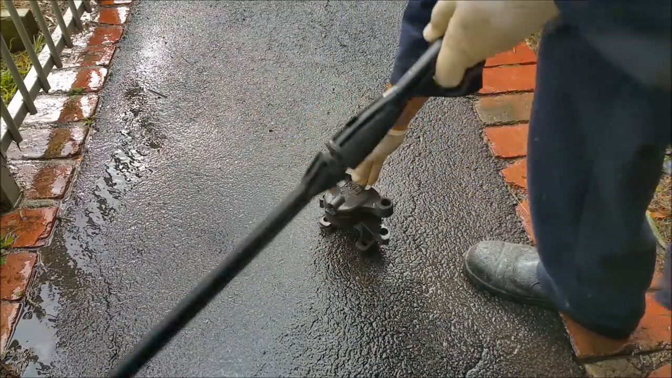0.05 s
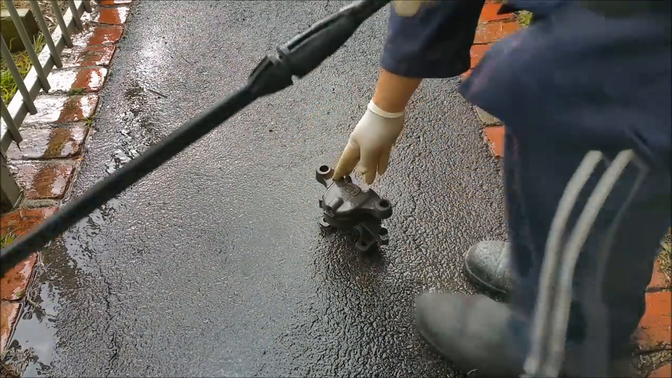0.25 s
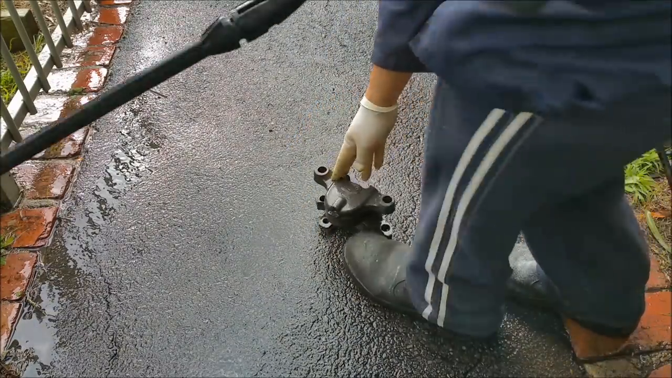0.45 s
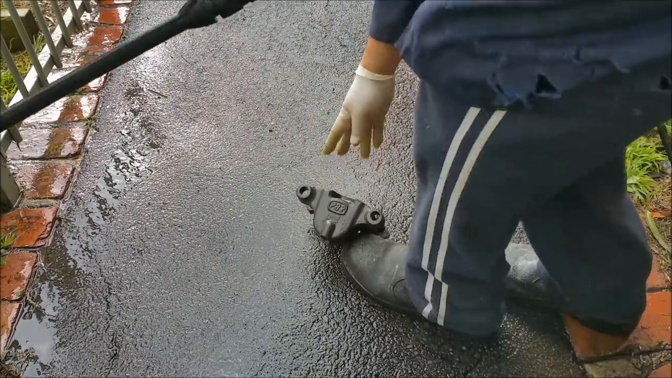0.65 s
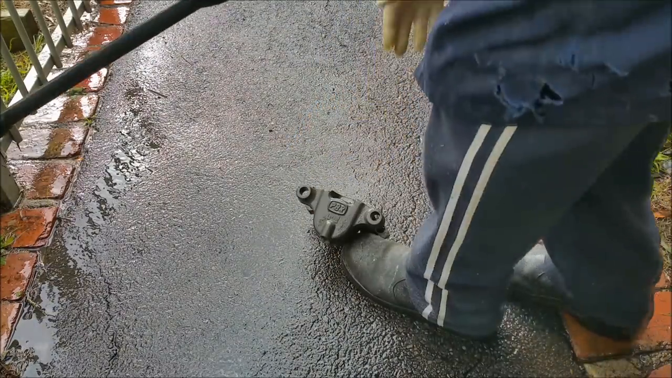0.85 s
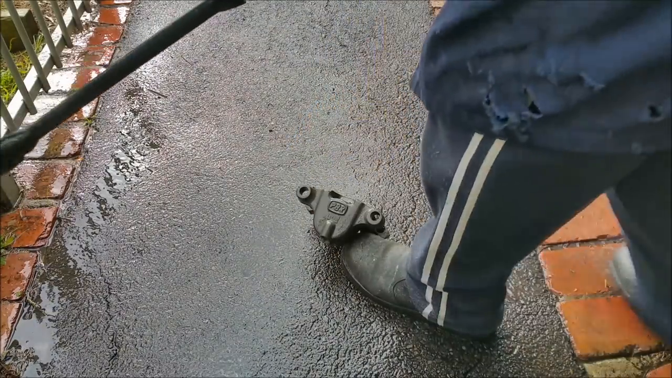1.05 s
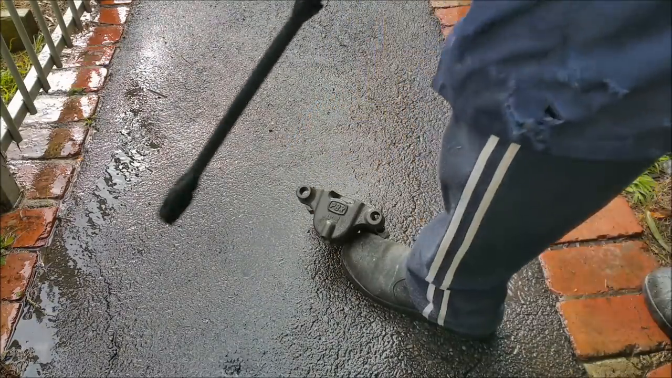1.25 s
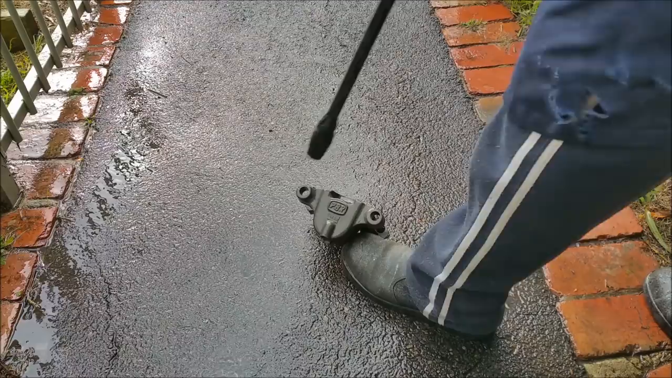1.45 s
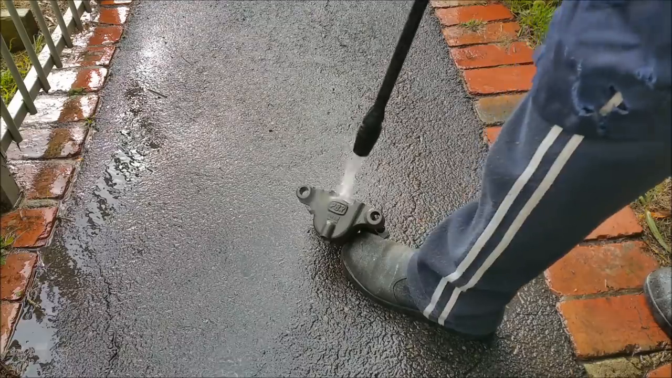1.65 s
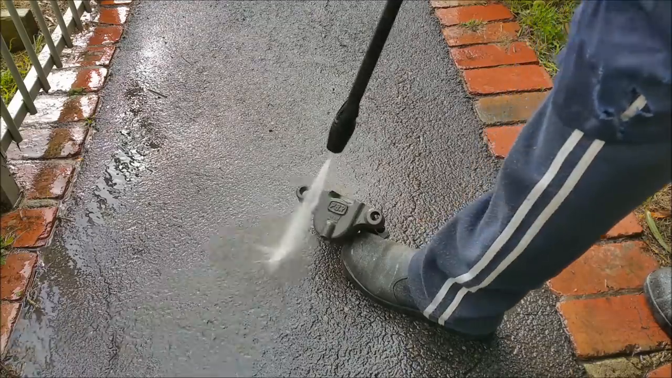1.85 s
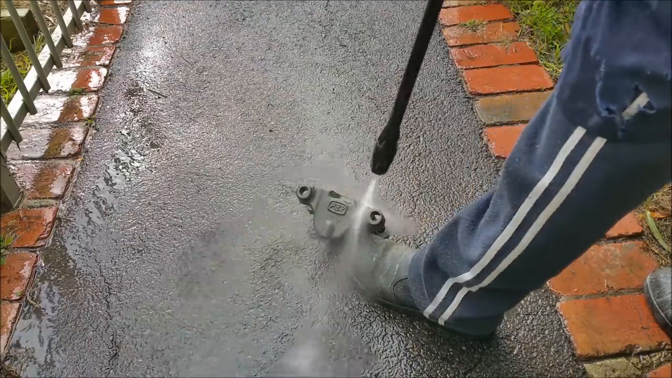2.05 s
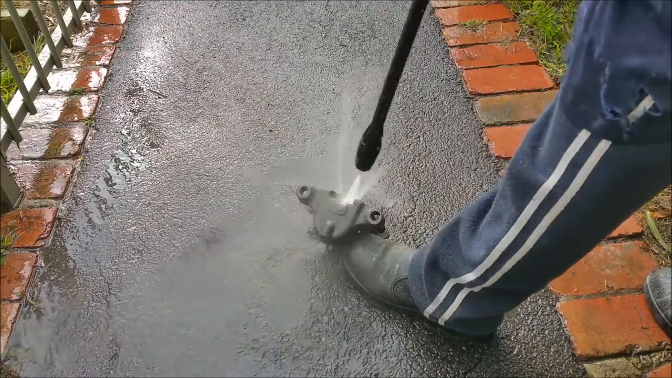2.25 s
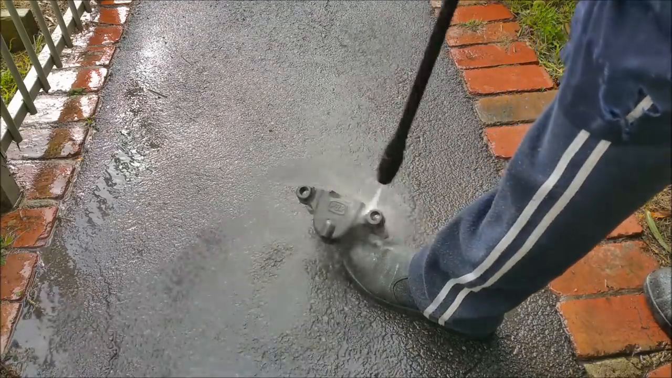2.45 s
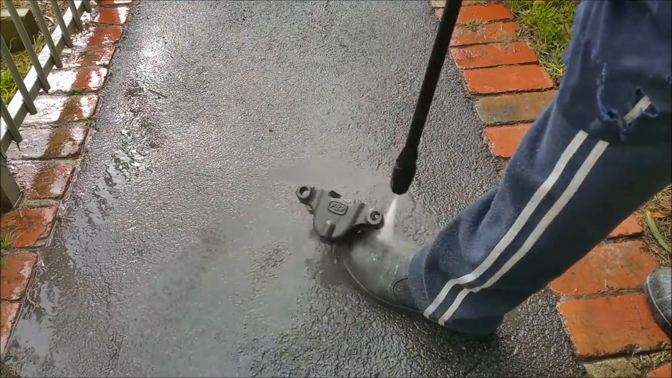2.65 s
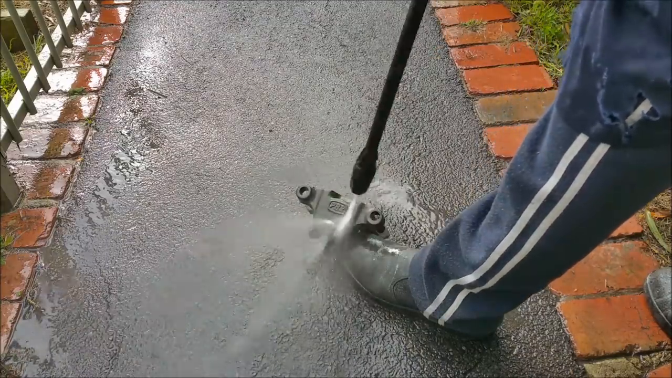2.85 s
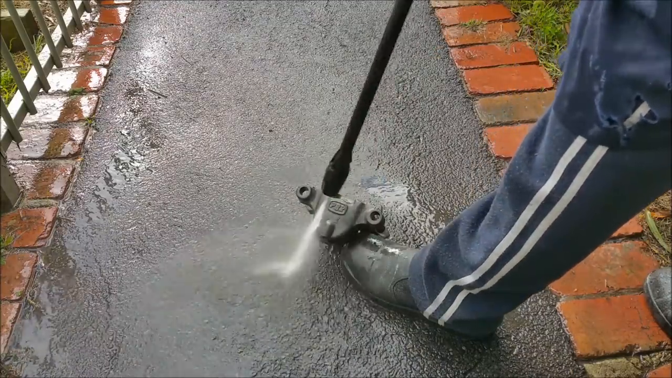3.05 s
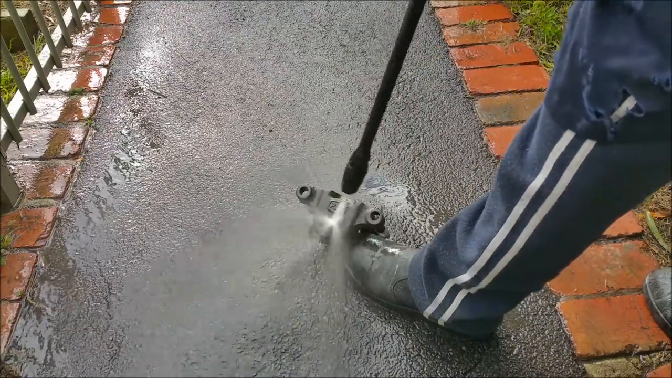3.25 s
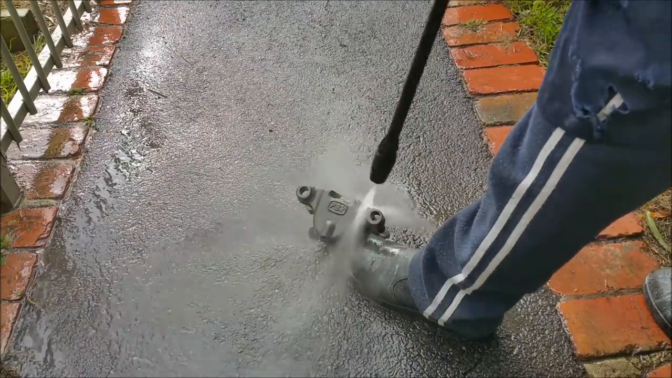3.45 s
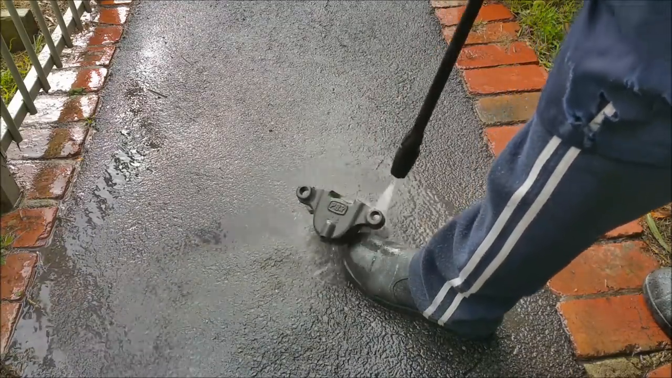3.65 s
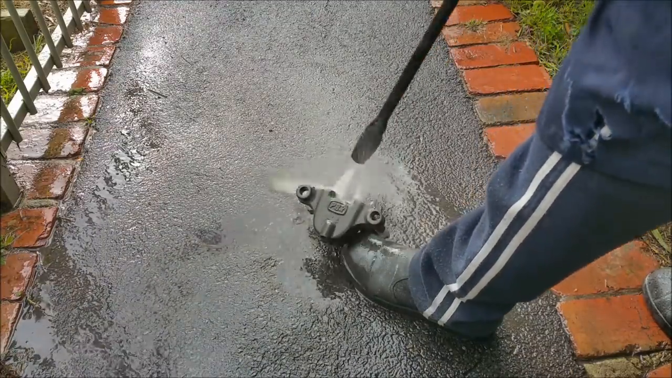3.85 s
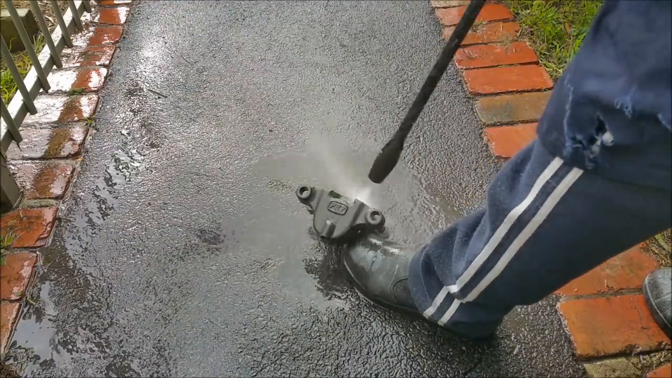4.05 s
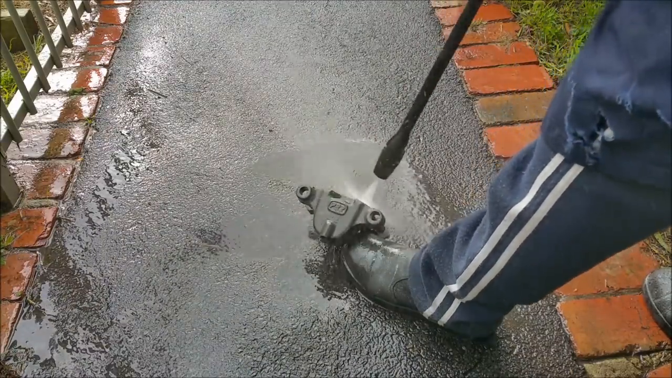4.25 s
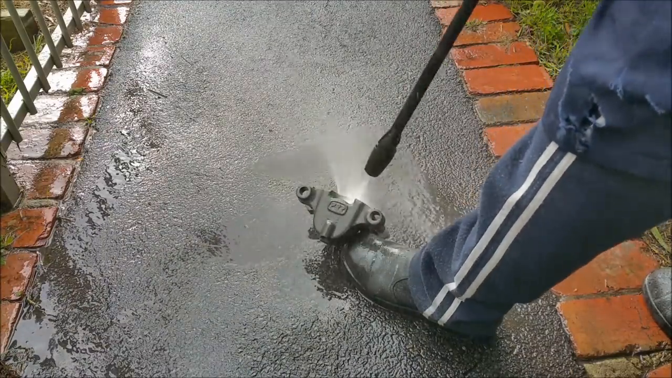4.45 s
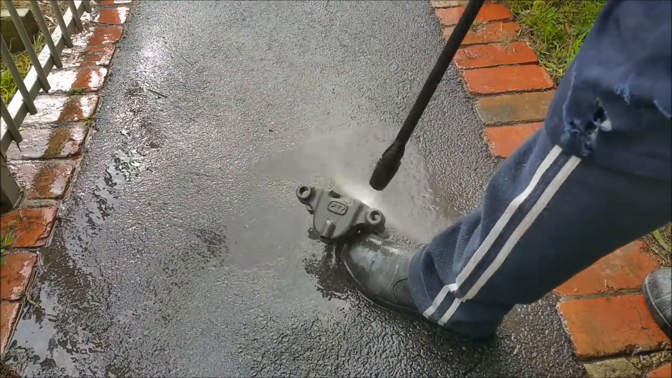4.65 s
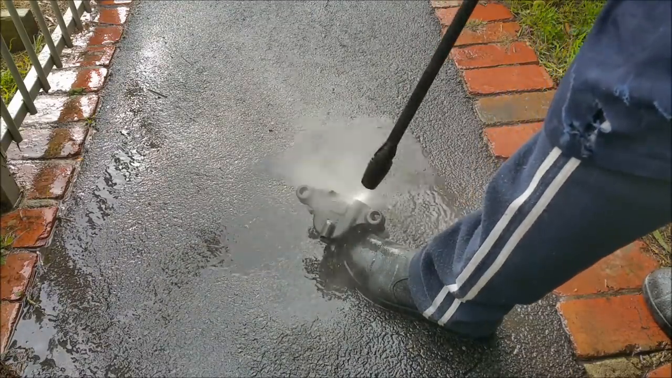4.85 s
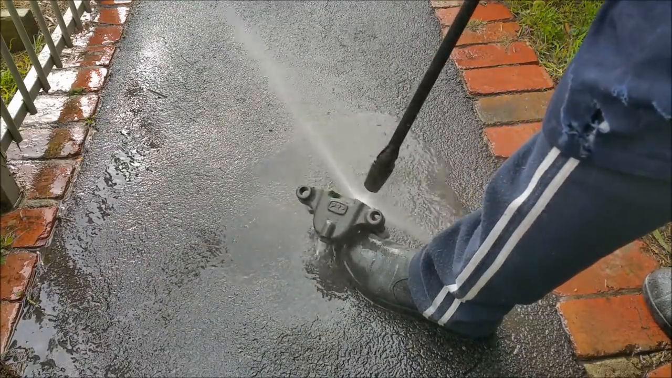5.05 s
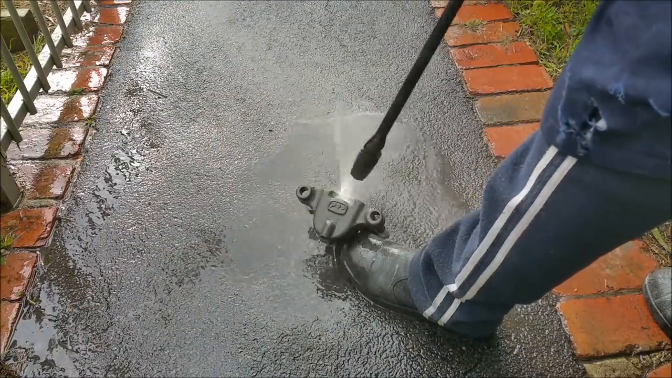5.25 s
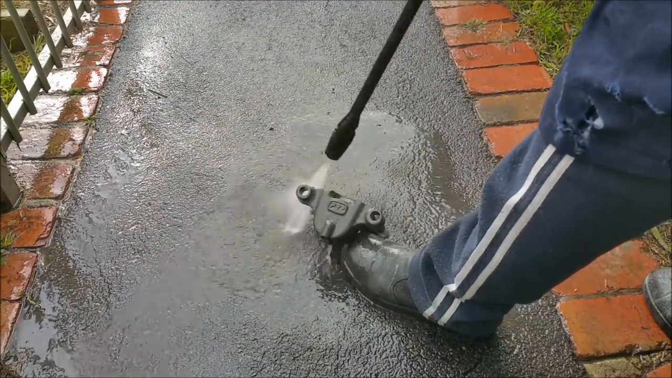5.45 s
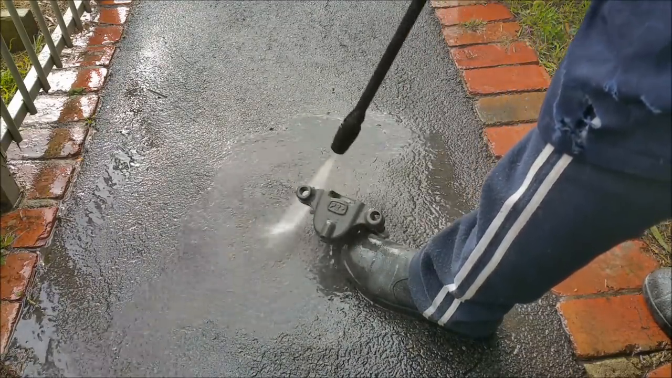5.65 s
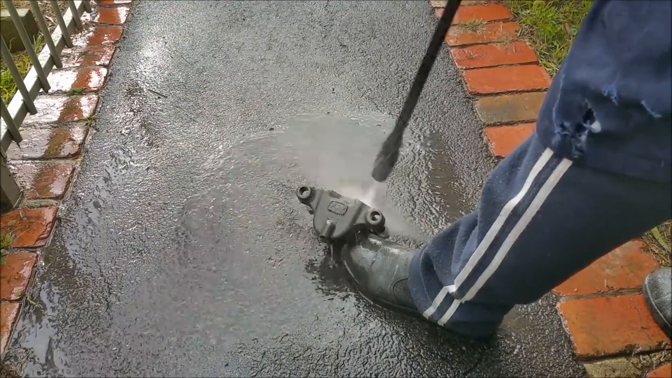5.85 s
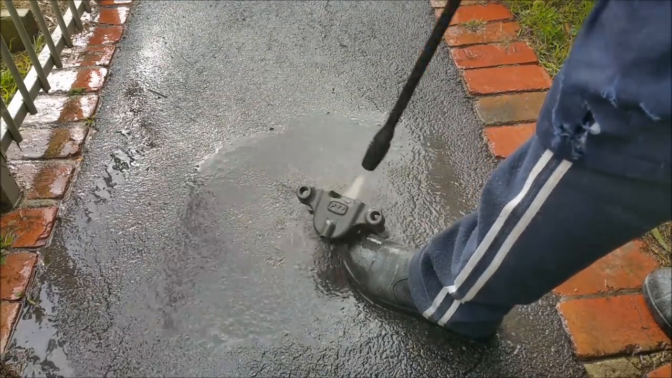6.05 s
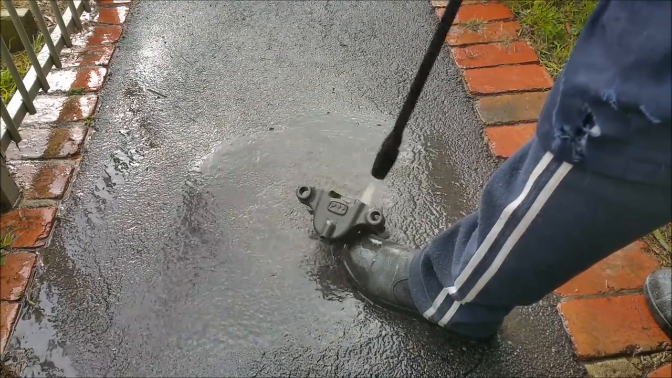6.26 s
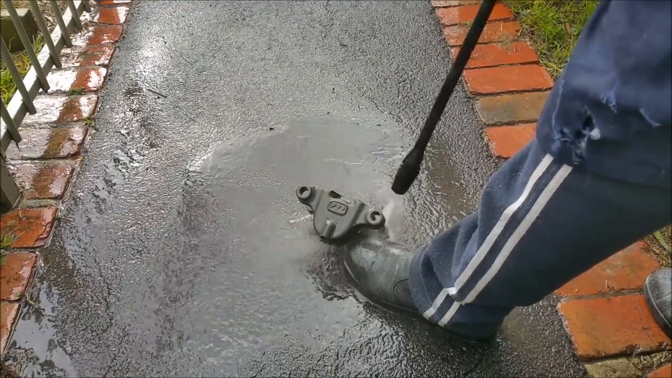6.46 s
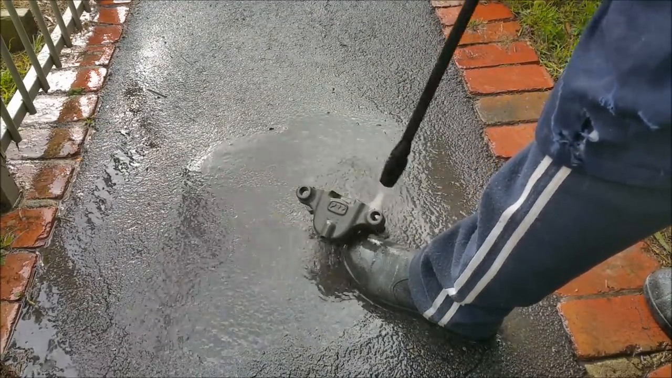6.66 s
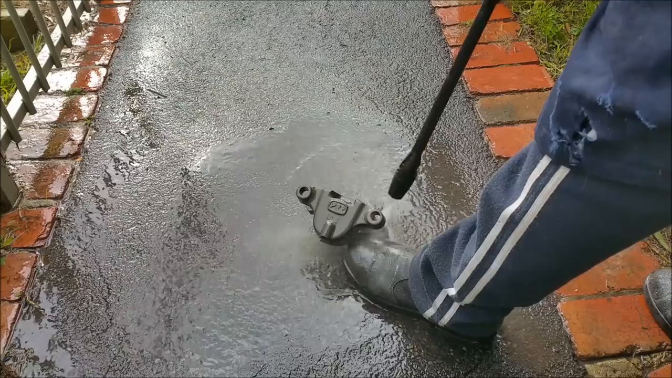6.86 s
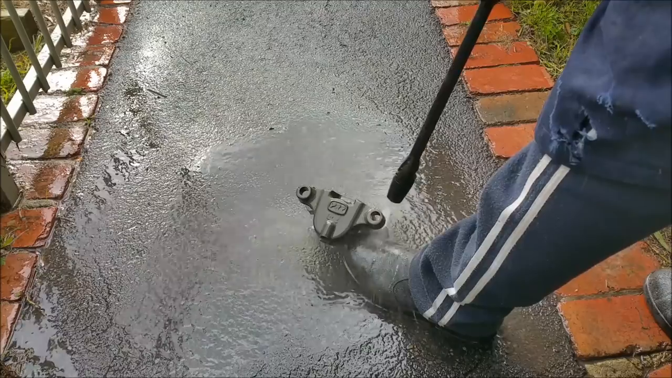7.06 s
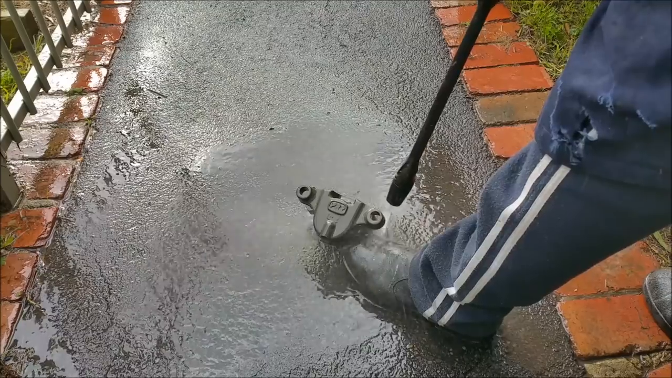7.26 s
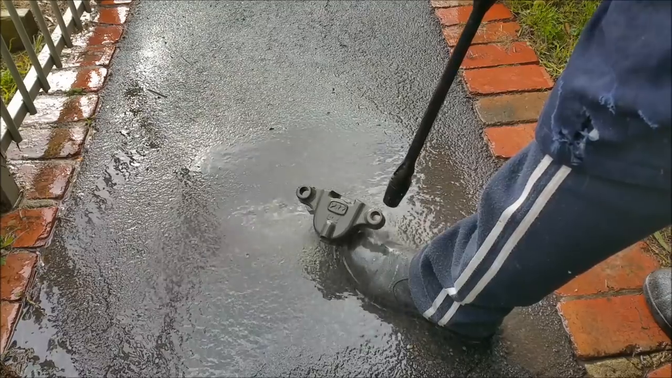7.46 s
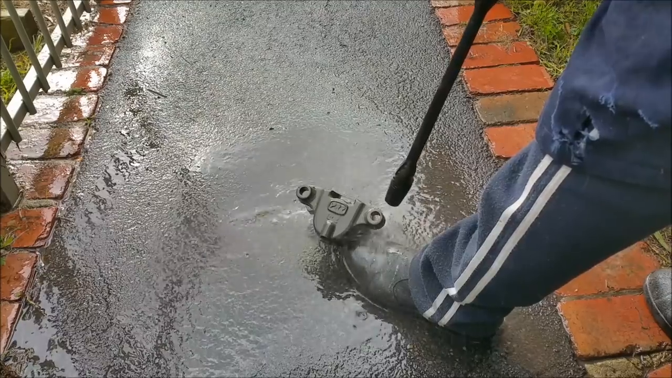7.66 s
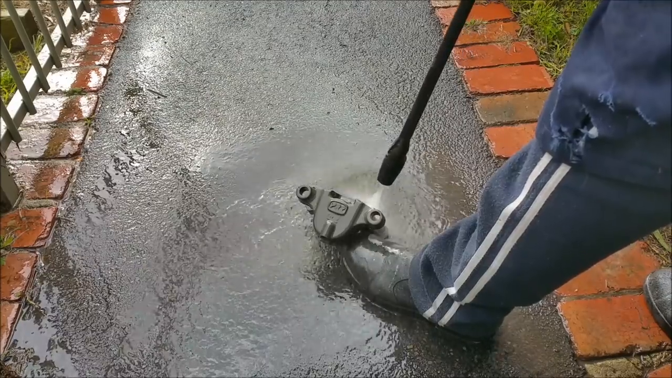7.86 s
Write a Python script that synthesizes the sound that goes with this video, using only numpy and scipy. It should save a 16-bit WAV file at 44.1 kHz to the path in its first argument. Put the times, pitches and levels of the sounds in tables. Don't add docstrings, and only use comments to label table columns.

```python
import sys
import numpy as np
from scipy import signal
from scipy.fft import rfft, irfft, next_fast_len
from scipy.io import wavfile
from scipy.ndimage import uniform_filter1d, map_coordinates

SR = 44100
rng = np.random.default_rng(int(sys.argv[2]) if len(sys.argv) > 2 else 0)


def master(y):
    cut = np.clip(np.atleast_2d(y).T, -1, 1)
    pcm = np.round(cut * 32767)
    wavfile.write(sys.argv[1], SR, pcm.astype(np.int16))


def magnitude_from_level(level_db):
    exponent = np.asarray(level_db, float) / 20
    return 10 ** exponent


N = 349272
TIME = np.arange(N) / SR
TRIGGER = 1.7415

# [f/Hz, correlation]
NEAR_ALIKE = [(40, .6), (200, .85), (400, .62), (700, .72), (1400, .5), (3000, .86), (4500, .68),
              (7000, .46), (15000, .43)]
# [f/Hz, gain/dB]
WIND_CUT = [(100, -10), (250, -8), (470, -4), (900, -0.5)]


def unit(x):
    return x / np.sqrt(np.mean(x ** 2) + 1e-20)


def along(points, hz):
    f, v = np.transpose(points)
    return np.interp(np.log(hz + 1), np.log(f + 1), v)


def curves(rows):
    s, *cols = np.transpose(rows)
    return [np.interp(TIME, s, c) for c in cols]


def wobble(rate):
    knots = rng.standard_normal(int(N * rate / SR) + 4)
    return map_coordinates(knots, [np.arange(N) * rate / SR])


def filtered(x, response):
    m = next_fast_len(N + SR // 2)
    return irfft(rfft(x, m) * response(np.fft.rfftfreq(m, 1 / SR)), m)[..., :N]


def rush(spectrum, patchy_db):
    z = signal.stft(rng.standard_normal(N), nperseg=512)[2]
    field = rng.standard_normal(z.shape)
    field = uniform_filter1d(uniform_filter1d(field, 6, 0), 8, 1)
    x = signal.istft(z * magnitude_from_level(patchy_db * unit(field)), nperseg=512)[1][:N]
    return unit(filtered(x, lambda hz: magnitude_from_level(along(spectrum, hz))))


def spread(x, alike, lag=0., t60=0):
    if t60:
        k = np.arange(SR // 8)
        tail = rng.standard_normal(SR // 8) * magnitude_from_level(-60 * k / SR / t60)
        scatter = signal.fftconvolve(x, tail / np.linalg.norm(tail))[:N]
    else:
        z = signal.stft(x, nperseg=256)[2]
        shuffled = z * np.exp(2j * np.pi * rng.random(z.shape))
        scatter = np.sqrt(2) * signal.istft(shuffled, nperseg=256)[1][:N]

    def weights(hz):
        angle = np.arccos(np.clip(along(alike, hz), -1, 1)) / 2
        return np.array([np.cos(angle), np.sin(angle)])

    mid, side = filtered(np.array([x, scatter]), weights)
    late_left = np.array([[1], [-1]]) * lag / 2
    ports = np.array([mid + side, mid - side])
    return filtered(ports, lambda hz: np.exp(-2j * np.pi * hz * late_left))


def grains(pitch_hz, scatter, cycles, size_db, count, size):
    when, chance = rng.random((count, 2)), rng.standard_normal((count, 1))
    at = (when[:, :1] * N).astype(int)
    hz, k = pitch_hz[at] * np.exp(scatter * chance), np.arange(size)
    turns = hz * k / SR
    size_gain = magnitude_from_level(-size_db * np.log(when[:, 1:] + 0.0032))
    tones = np.sin(2 * np.pi * turns) * turns * np.exp(-turns / cycles)
    return np.bincount((at + k).ravel(), (size_gain * tones).ravel(), N + size)[:N]


def crossing(s, length):
    t = TIME - s
    return np.clip(np.minimum(t, length - t) / 0.025 + .5, 0, 1)


def town():
    # [f/Hz, level per Hz/dB]
    traffic_spectrum = [(15, -35), (30, -1.5), (80, 0.5), (450, -12.5), (950, -13.5), (1500, -23),
                        (4500, -28), (6500, -38)]
    # [f/Hz, level per Hz/dB]
    air_spectrum = [(1500, -20), (2500, 0), (5500, -3), (6300, -10), (15000, -11)]
    # [f/Hz, correlation]
    far_alike = [(100, 0.84), (350, 0.9), (600, 0.056), (15000, .05)]
    swell_db = .7 * wobble(3) + .5 * wobble(14)
    traffic = magnitude_from_level(-53.5 + swell_db) * rush(traffic_spectrum, patchy_db=1.2)
    air = magnitude_from_level(-72) * rush(air_spectrum, patchy_db=.5)
    return spread(traffic + air, far_alike)


def birds():
    # [t/s, length/s, start f/Hz, end f/Hz, level/dB]
    whistles = [(.005, 0.13, 3570, 3580, -69), (.06, .05, 3300, 3320, -75), (.38, 0.05, 2280, 2480, -75),
                (.39, .06, 2150, 2050, -77), (.43, 0.071, 1920, 1890, -70), (.87, 0.16, 1160, 1100, -70),
                (1.038, 0.052, 1313, 1300, -69), (1.095, 0.056, 1320, 1270, -65),
                (1.143, 0.3, 1280, 1290, -76), (1.08, .035, 2600, 2700, -79),
                (1.47, 0.044, 3400, 2800, -81), (1.482, 0.039, 2450, 2100, -81),
                (1.522, .045, 1950, 1870, -72), (1.62, 0.076, 1190, 1260, -69)]
    out, waver = np.zeros(N), 1 + .012 * wobble(120)
    for s, length, hz, end_hz, db in whistles:
        start, u = round(s * SR), np.linspace(0, 1, round(length * SR))
        pitch = (hz + (end_hz - hz) * u) * waver[start:][:len(u)]
        swell = np.sin(np.pi * u) ** 0.64
        tone = np.sin(2 * np.pi * np.cumsum(pitch) / SR)
        out[start:][:len(u)] += magnitude_from_level(db + 8.5) * swell * tone
    return spread(out * magnitude_from_level(3 * wobble(70)), [(1000, .5)], t60=.2)


def boot():
    # [t/s, level/dB, rise/s, t60/s, centre f/Hz]
    scuffs = [(.03, -67, .003, .03, 4400), (.09, -69, .003, .03, 6100), (.11, -61, .08, .16, 1500),
              (.162, -46, .002, .05, 800), (.19, -62, .012, .06, 2600), (.354, -66, .003, .04, 600),
              (.415, -67, .002, .03, 4400), (.452, -68, .002, .03, 4400), (.479, -48, .022, .6, 350),
              (.49, -62, .015, .3, 4000), (.51, -46, .005, .15, 600), (.511, -55, .003, .2, 3200),
              (.5875, -49, .002, .2, 600), (.588, -52, .002, .13, 3300), (.658, -50, .08, .9, 350),
              (.676, -60, .003, .3, 3800), (.725, -52, .002, .09, 4200), (.727, -60, .003, .1, 11500),
              (.733, -47, .004, .15, 550), (.762, -50, .002, .05, 2600), (.766, -63, .01, .2, 12500),
              (.784, -55, .002, .1, 4000), (.825, -58, .002, .05, 3000), (.84, -53, .01, .15, 500),
              (.968, -56, .001, .05, 2500), (.971, -48, .016, .16, 350), (.982, -59, .018, .12, 3200),
              (1.211, -52, .022, .4, 220), (1.222, -62, .018, .5, 3400), (1.285, -62, .008, .07, 5300),
              (1.47, -65, .02, .12, 2600), (1.62, -65, .075, .3, 3900)]
    # [f/Hz, gain/dB]
    dull = [(5600, 0), (6200, -6), (9000, -6), (10500, 0)]
    out, t = np.zeros(N + SR), np.arange(SR // 2) / SR
    for s, db, rise, t60, hz in scuffs:
        band = signal.butter(2, [.5 * hz, min(1.8 * hz, SR / 2.2)], "band", fs=SR)
        slips = rng.standard_normal(len(t)) * magnitude_from_level(2 * rng.standard_normal(len(t)))
        grit = unit(signal.lfilter(*band, slips))
        fall_db = -60 * np.maximum(t - rise, 0) / t60
        out[round(s * SR):][:len(t)] += magnitude_from_level(db + fall_db) * np.minimum(t / rise, 1) * grit
    return spread(filtered(out[:N], lambda hz: magnitude_from_level(along(dull, hz))), NEAR_ALIKE)


def casting():
    # [t/s, crack level/dB, low modes level/dB, high modes level/dB]
    knocks = [(.499, -48, -58, -58), (0.5082, -44, -26.5, -40.5), (0.526, -44, -49, -52),
              (0.5877, -32, -44, -41), (.676, -49, -47, -45), (0.689, -47, -44, -49), (.714, -50, -47, -52),
              (0.7242, -36, -36, -38), (.732, -40, -38, -50), (0.763, -33, -50, -48),
              (0.783, -38, -37, -39.5), (.825, -41, -64, -56)]
    # [f/Hz, level/dB, t60/s]
    iron_modes = [(1970, -14, 0.24), (2370, 2, 0.069), (3200, -23, 0.4), (3900, -7, 0.13), (4700, -1, 0.23),
                  (5330, -16, .3), (5650, -9.5, 0.085), (6030, -21, 0.5), (6895, -33, .6),
                  (7200, -32, 0.25), (8535, -35, .18), (9383, -31, .7), (11620, -31, .12), (12650, -28, .2),
                  (5220, -24, .2), (7420, -35, .4), (7910, -41, .25), (8850, -35, .25), (9625, -36, .5),
                 (10965, -32, .3), (11460, -30, .15), (13070, -30, .12), (13450, -34, .25),
                 (13880, -31, .15), (14800, -32, .1), (15400, -33, .1)]
    seated = .735
    out, t = np.zeros(N + SR), np.arange(SR // 2) / SR
    hz, mode_db, t60 = np.transpose(iron_modes)[:, :, None]
    dull = signal.butter(3, 6000, fs=SR)
    for s, crack_db, low_db, high_db in knocks:
        lift = 1 + (hz < 4300) * np.interp(s, [.53, .6, .78], [0, .025, .055])
        lift += (hz < 5000) * 0.008 * (s > .7)
        level = mode_db + np.where(hz < 4300, low_db, high_db) + 5 * (hz > 6500)
        level += np.where(hz < 5000, 1.5, 3.5) * rng.standard_normal(hz.shape)
        level -= 14 * (np.abs(hz - 3200) < 100) * (s > .55)
        level += 2 * (hz > 5200) * (s > .72)
        landing = np.clip((s + t - seated) / .008, 0, 1)
        level = level - 11 * (hz < 5200) * (s < seated) * landing
        ring = np.sum(magnitude_from_level(level - 60 * t / t60) * np.sin(2 * np.pi * hz * lift * t), axis=0)
        noise = signal.lfilter(*dull, 1.1 * rng.standard_normal(len(t)))
        crack = magnitude_from_level(crack_db) * (magnitude_from_level(-60 * t / 0.01) + magnitude_from_level(-19 - 60 * t / .2)) * noise
        out[round(s * SR):][:len(t)] += (ring + crack) * (1 - np.exp(-t / 0.0011))
    boot_damping = np.clip((.815 - TIME) / 0.042, magnitude_from_level(-17), 1)
    chatter = magnitude_from_level(2.2 * wobble(150))
    return boot_damping * chatter * out[:N]


def asphalt():
    # [t/s, peak level/dB, f/Hz]
    thuds = [(.478, -44, 190), (.5, -30, 480), (0.5044, -25, 201), (0.5092, -26, 660), (0.511, -22, 292),
             (0.525, -30, 420), (0.5316, -25, 163), (.55, -36, 280), (0.579, -36, 350), (0.588, -27, 282),
             (0.596, -34, 330), (.61, -38, 300), (.661, -38, 230), (.677, -35, 650), (0.691, -35, 600),
             (.707, -34, 211), (0.724, -32, 714), (0.732, -17.5, 332), (.742, -28, 373), (.751, -27.5, 380),
             (0.764, -21, 262), (.784, -31, 523), (0.838, -39, 230), (0.9685, -31, 1440), (0.974, -33, 690),
             (1.002, -45, 500)]
    out, t = np.zeros(N + SR), np.arange(SR // 2) / SR
    dull = signal.butter(2, 800, fs=SR)
    for s, db, hz in thuds:
        decay = magnitude_from_level(-60 * t * hz / 7.4)
        push = decay * np.sin(2 * np.pi * hz * t) * (1 - np.exp(-t * hz * 4))
        grit = unit(signal.lfilter(*dull, rng.standard_normal(len(t))))
        out[round(s * SR):][:len(t)] += magnitude_from_level(db + 5.5) * (push + magnitude_from_level(-17.5 - 60 * t / 0.039) * grit)
    return out[:N]


def part():
    alike = [(1000, .97), (1500, .7), (2400, .9), (5000, .85), (8000, .5)]
    return spread(casting() + asphalt(), alike, t60=.03)


def pump():
    # [t/s, stroke rate f/Hz]
    runup = [(1.745, 13), (1.8, 33), (1.84, 41.5), (1.875, 60), (1.91, 71.5), (1.97, 77.5), (2.05, 79.3),
             (2.3, 77.86)]
    # [t/s, stroke rate f/Hz]
    running = [(2.65, 77.5), (3.85, 77.6), (4.75, 77.9), (5.05, 78.55), (5.9, 78.9), (7.92, 79.25)]
    # [multiple of the stroke rate, level shaded by the operator/dB, level unshaded/dB]
    harmonics = [(1, -49.5, -50), (2, -54, -53), (3, -38, -41), (4, -44, -46.5), (5, -39.5, -40.5),
                 (6, -36, -38.5), (7, -48, -41), (8, -40, -38), (9, -41, -32), (10, -47, -32.5),
                 (11, -46, -41), (12, -44, -38), (13, -49, -34.5), (14, -37, -39), (15, -33, -38),
                 (16, -37, -37), (17, -45, -43), (19, -45, -43), (21, -44, -42), (22, -43, -38),
                 (23, -38, -41), (26, -48, -36)]
    # [t/s, harmonics level/dB, motor noise level/dB, unshaded share 0-1]
    course = [(1.745, -12, -38, 0.8), (1.835, 0, -33, 0.9), (1.865, -6, -34, 0.7), (1.92, -0.5, -34, 0.85),
              (2.18, -0.5, -29.5, 0.86), (2.28, -2, -33.5, 0.26), (3.4, -1, -31.5, 0.2),
              (4.2, -0.5, -31, 0.86), (5, 1.5, -34, 1), (6.5, 2, -29, 0.97), (7.92, -1, -39.5, 1)]
    # [f/Hz, level per Hz/dB]
    motor_spectrum = [(24, -60), (40, -24.5), (210, -18), (355, -8), (896, -5), (2600, -11.5), (3380, -36),
                      (5720, -120)]
    lag = .00034
    speed, = curves(runup + running)
    angle = 2 * np.pi * np.cumsum(speed * (1 + 0.0016 * wobble(8))) / SR
    lines_db, noise_db, free = curves(course)
    lines = np.zeros(N)
    for k, shaded_db, open_db in harmonics:
        level = lines_db + shaded_db + free * (open_db - shaded_db) + 4.0
        level += 1.0 * wobble(2.915) + 2.0 * wobble(22)
        shake = (speed / speed.max()) ** (1.6 * (k != 9))
        lines += magnitude_from_level(level) * shake * np.sin(k * angle + 2 * np.pi * rng.random())
    noise = (1 + 0.2 * np.sin(angle)) * rush(motor_spectrum, patchy_db=2.0)
    noise = magnitude_from_level(noise_db) * filtered(noise, lambda hz: magnitude_from_level(-along(WIND_CUT, hz)))
    on = TIME > TRIGGER
    noise_alike = [(60, .7), (300, .9), (1500, .8)]
    return spread(on * lines, [(100, 1)], lag) + spread(on * noise, noise_alike, lag)


def pool_splash():
    # [t/s, length/s, level/dB]
    digs = [(1.881, 0.048, -28), (1.98, 0.15, -29), (2.206, 0.097, -32), (2.442, 0.026, -18),
            (2.488, 0.04, -26.5), (2.572, 0.029, -24), (2.747, 0.11, -26), (3.025, 0.11, -28),
            (3.184, 0.062, -28), (3.65, 0.098, -29), (3.75, 0.045, -23), (3.797, .03, -20.5),
            (3.828, 0.045, -18), (3.877, 0.032, -22.5), (4.1, 0.063, -24), (5.461, 0.36, -30),
            (5.769, 0.072, -22.5), (5.881, 0.051, -19.5), (5.992, 0.14, -26.5), (6.178, 0.19, -23),
            (6.57, 0.064, -32), (6.677, 0.11, -25.5), (6.812, 0.045, -30), (6.97, 0.083, -22.5),
            (7.277, 0.3, -26.5), (7.56, 0.24, -28.5), (7.825, 0.069, -25)]
    # [f/Hz, level per Hz/dB]
    splash_spectrum = [(40, -29), (90, -15), (200, -14.5), (400, -9), (650, 1), (1000, 0.5), (1450, -12.5),
                       (2500, -27)]
    power = magnitude_from_level(2 * -35)
    for s, length, db in digs:
        power = power + magnitude_from_level(2 * db) * crossing(s, length)
    unsteady = magnitude_from_level(1.4 * wobble(40) + 1.6 * wobble(110))
    return np.sqrt(power) * unsteady * rush(splash_spectrum, patchy_db=2.5)


def spray_band(flutter):
    # [t/s, level/dB, f/Hz]
    band_course = [(1.8, -28, 3530), (2.0, -30, 3740), (2.3, -29.5, 3300), (2.75, -28.5, 3420),
                   (2.95, -26.5, 3630), (3.25, -26.5, 4070), (3.55, -25.5, 3430), (3.72, -32, 3970),
                   (3.84, -33, 3388), (3.92, -22, 4100), (4.0, -38, 3800), (4.1, -36, 4200), (4.3, -31.5, 3970),
                   (4.5, -23, 3900), (4.72, -26.5, 3900), (4.9, -30, 4213), (5.2, -27.5, 3900),
                   (5.5, -47, 3495)]
    ringing_db, ringing_hz = curves(band_course)
    ringing_db -= 40 * np.maximum(TIME - band_course[-1][0], 0)
    tones = grains(ringing_hz, scatter=.11, cycles=1.6, size_db=3.0, count=30000, size=120)
    return magnitude_from_level(ringing_db + .5 * flutter) * unit(tones)


def bore_song(recess_hz):
    # [f/Hz, bandwidth/Hz, level/dB]
    bores = [(1655, 74, -2.5), (2050, 55, -2.5), (2440, 90, -10), (2800, 73, -2), (3030, 100, -4),
             (3400, 82, 0), (4100, 70, -7.5), (4760, 60, -4)]
    song = np.zeros(N)
    for hz, width, db in bores:
        resonator = signal.iirpeak(hz, hz / width, fs=SR)
        tone = unit(signal.lfilter(*resonator, rng.standard_normal(N)))
        nearness = np.exp(-(np.log(recess_hz / hz) / .3) ** 2 / 2)
        song += magnitude_from_level(db + 3.5 * wobble(12)) * nearness * tone
    return unit(song)


def recess_howl(contact_db, flutter):
    # [t/s, length/s, howl level/dB, f/Hz]
    howls = [(2.018, 0.096, -35, 2190), (2.237, 0.024, -21.5, 2780), (2.296, 0.09, -40, 2520),
             (2.442, 0.042, -21.5, 2000), (2.553, 0.025, -22.5, 2000), (2.578, 0.025, -19, 2520),
             (2.642, 0.037, -24.5, 2560), (2.742, 0.13, -25.5, 2298), (3.07, 0.067, -26.5, 2690),
             (3.642, 0.1, -28.5, 2080), (3.753, .03, -26, 1890), (3.782, 0.046, -20, 2150),
             (3.83, 0.078, -19, 2300), (4.113, 0.03, -32, 1880), (4.34, 0.058, -25.5, 2230),
             (4.417, 0.31, -26, 3223), (5.476, 0.025, -25, 2600), (5.598, 0.12, -27.5, 2960),
             (5.762, 0.064, -28.5, 3220), (5.9, 0.039, -27, 2900), (6.032, 0.089, -18, 2240),
             (6.441, .04, -18, 2200), (6.48, 0.045, -21, 2500), (6.534, 0.044, -20, 2440),
             (6.569, 0.053, -18, 2110), (6.815, 0.037, -18, 2150), (6.853, 0.08, -22.5, 2890),
             (6.944, 0.066, -17.5, 2570), (7.03, 0.036, -20, 2490), (7.056, 0.043, -18.5, 2750),
             (7.1, 0.077, -18, 2560), (7.186, 0.074, -20, 2500), (7.246, 0.093, -19, 2480),
             (7.347, 0.13, -18.5, 2850), (7.502, 0.13, -21, 2570), (7.623, 0.11, -18, 2950),
             (7.748, 0.033, -15, 2800), (7.797, 0.066, -21.5, 2750)]
    # [f/Hz, gain/dB]
    howl_spectrum = [(500, -30), (1000, 18.5), (1800, 5), (2700, 6.5), (3550, 10), (4000, 3), (6000, -22),
                     (12000, -50)]
    face_power, face_hz = magnitude_from_level(2 * (-32 + contact_db)), 2730
    power, weighted_hz = face_power, face_power * face_hz
    for s, length, db, hz in howls:
        recess_power = magnitude_from_level(2 * db) * crossing(s, length)
        power = power + recess_power
        weighted_hz = weighted_hz + recess_power * hz
    recess_hz = weighted_hz / power
    howl = grains(recess_hz, scatter=.18, cycles=2.0, size_db=2.2, count=30000, size=150)
    howl = unit(filtered(howl, lambda hz: magnitude_from_level(along(howl_spectrum, hz))))
    howl = magnitude_from_level(.7 * flutter + 1.1 * wobble(45)) * howl
    sound = np.sqrt(power) * (howl + magnitude_from_level(-5) * bore_song(recess_hz))
    return sound, 1 - face_power / power


def hiss_and_spray(strength_db, contact_db, buried, flutter):
    # [t/s, gain of hiss/dB]
    glances = [(2.1, 2), (3.94, 2.5), (4.01, 3), (5.16, 2.5), (5.48, 0), (5.69, 3), (5.94, 2)]
    # [f/Hz, level per Hz/dB]
    hiss_spectrum = [(4500, -14), (5700, -2.5), (6600, -1), (7500, -4.5), (8800, -2.5), (10200, 2),
                     (12500, -0.5), (15800, -1)]
    # [f/Hz, level per Hz/dB]
    spray_spectrum = [(530, -47), (900, -9), (1700, -1.5), (2200, -8.5), (3700, -5), (5450, -4),
                      (6100, -20), (7000, -22.5)]
    glance_db = sum(db * crossing(s, 0.046) for s, db in glances)
    hiss_db = strength_db + 1.5 + glance_db - 0.5 * buried
    hiss_db += .5 * flutter + 0.4 * wobble(9) + 0.22 * wobble(370)
    spray_db = -23 + 0.07 * (strength_db - strength_db.mean()) + contact_db - 0.63 * glance_db
    spray_db += 0.69 * flutter + 1.4 * wobble(14) + 0.59 * wobble(300)
    hiss = magnitude_from_level(hiss_db) * rush(hiss_spectrum, patchy_db=1.0)
    spray = magnitude_from_level(spray_db) * rush(spray_spectrum, patchy_db=0.8)
    return hiss, spray


def jet():
    # [t/s, jet level at the camera/dB, contact level with the metal/dB]
    aim = [(1.95, -25.5, -1.5), (2.15, -25, 0.5), (2.4, -25, 1), (2.52, -26.5, -1), (2.7, -25, -0.5),
           (3.05, -22.5, -1.5), (3.25, -24, -2), (3.35, -23.5, -2), (3.85, -24.5, 3), (4.6, -23.5, -1.5),
           (4.95, -22.5, -0.5), (5.4, -24, 0.5), (5.55, -24.5, 1.5), (6.4, -25.5, 1.5), (6.8, -25.5, -1),
           (7.0, -25, 3.5), (7.55, -23.5, 2.5), (7.8, -25.5, 2), (7.92, -25, -0.5)]
    strength_db, contact_db = curves(aim)
    flutter = wobble(25)
    recess, buried = recess_howl(contact_db, flutter)
    hiss, spray = hiss_and_spray(strength_db, contact_db, buried, flutter)
    t = TIME - TRIGGER
    valve = np.clip(t / 0.00091, 0, 1)
    leak = magnitude_from_level(-19) * np.clip(1 + t / .007, 0, 1) * (t < 0)
    spit = 1.9 * np.exp(-np.abs(t) / 0.0066)
    pressure = 1 - (1 - 0.41) * np.exp(-(t / 0.12) ** 2)
    flow = (pressure + spit) * hiss
    flow += (pressure + .3 * spit) * (spray + recess + spray_band(flutter))
    flow += pressure * pool_splash()
    return spread((valve + leak) * flow, NEAR_ALIKE)


def scene():
    return town() + birds() + boot() + part() + pump() + jet()


def low_pass(x):
    return signal.sosfilt(signal.butter(12, 15765, fs=SR, output="sos"), x)


def record(dry):
    # [f/Hz, level/dB]
    port_db = [(60, 1.5), (600, 1), (1500, 2.3), (5200, 3), (6000, -5.5), (7000, -6), (8000, -1.5),
               (15000, 0)]
    # [f/Hz, phase/rad]
    port_lead = [(2000, 0.077), (3500, 0.51), (4800, 0.73), (6000, 2), (7000, 1.26), (8200, 0.54),
                 (16000, 1.6)]
    sign = np.array([[.5], [-.5]])

    def port_response(hz):
        return magnitude_from_level(sign * along(port_db, hz)) * np.exp(-1j * sign * along(port_lead, hz))

    def band(hz):
        return np.clip((15800 - hz) / 90, 0, 1) * hz ** 2 / (hz ** 2 + 30 ** 2)

    ports = filtered(dry, port_response)
    thinned = filtered(ports, lambda hz: magnitude_from_level(along(WIND_CUT, hz)))
    on = np.clip((TIME - 3.42) / 0.014, 0, 1)
    full = np.tanh(.9 * (ports + on * (thinned - ports))) / .9
    return low_pass(filtered(full, band))


dry = scene()
out = record(dry)
master(out)
```